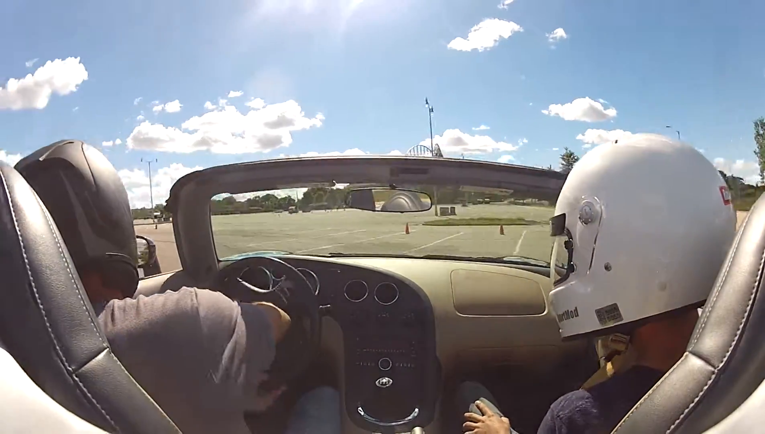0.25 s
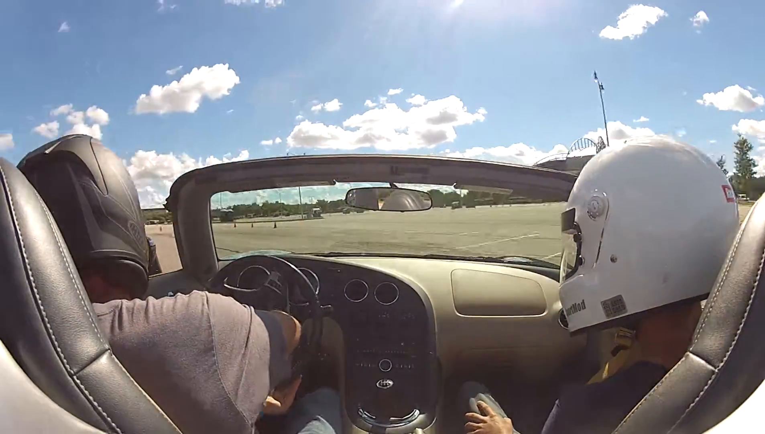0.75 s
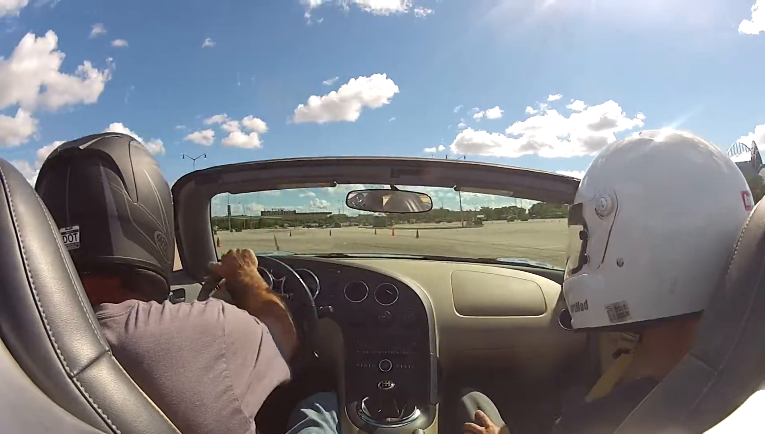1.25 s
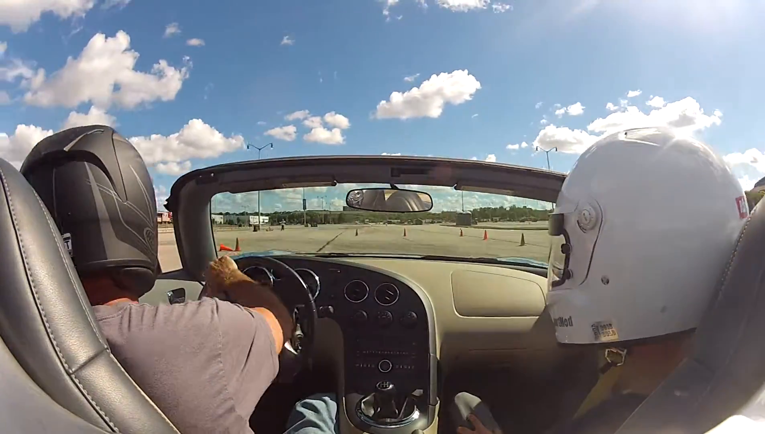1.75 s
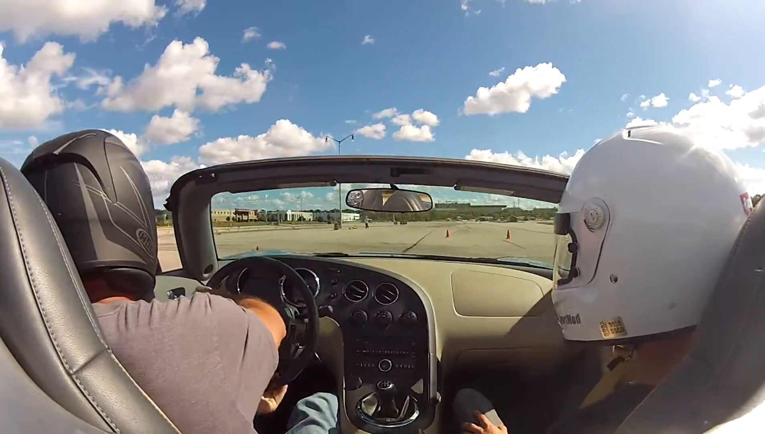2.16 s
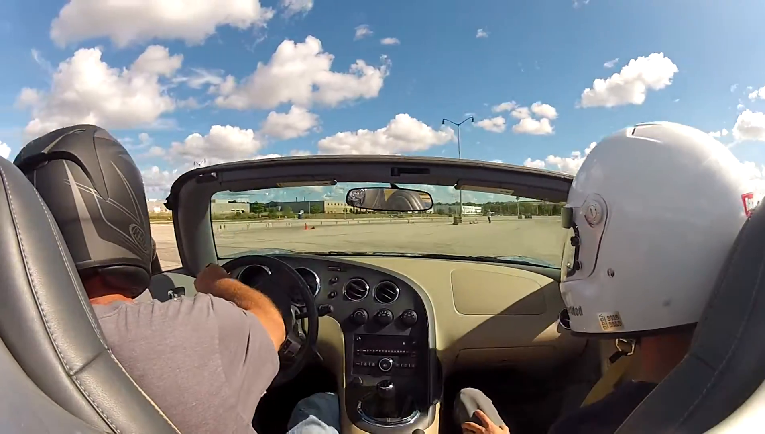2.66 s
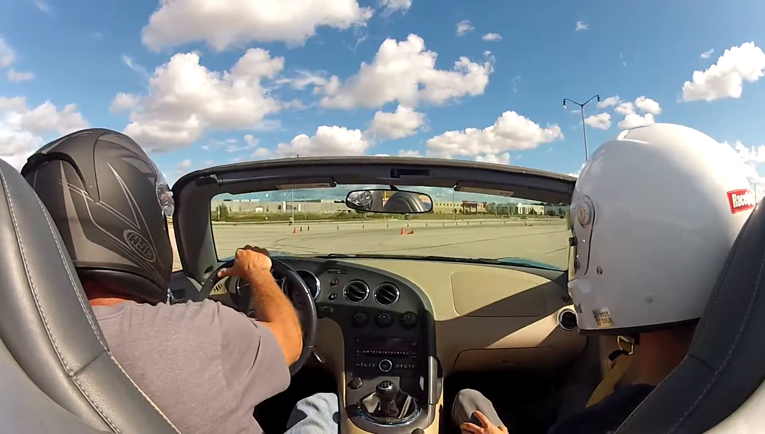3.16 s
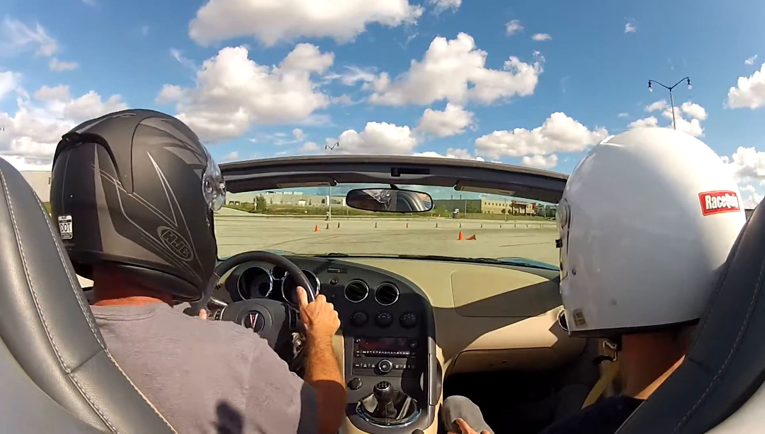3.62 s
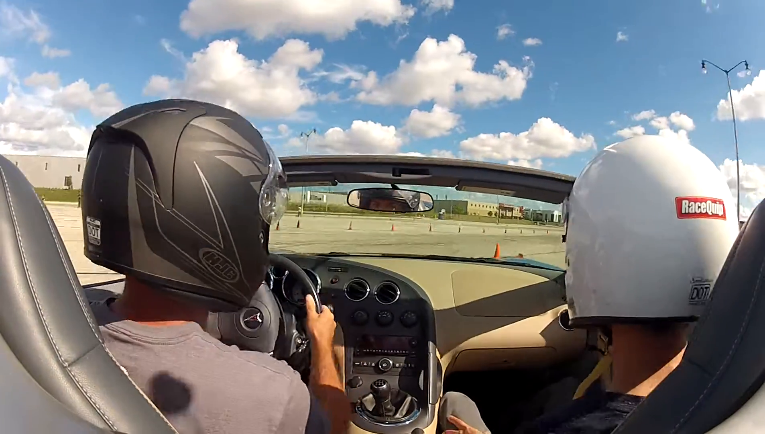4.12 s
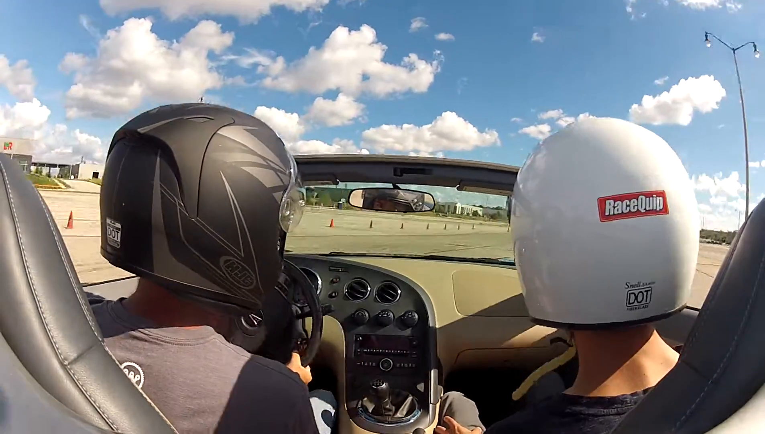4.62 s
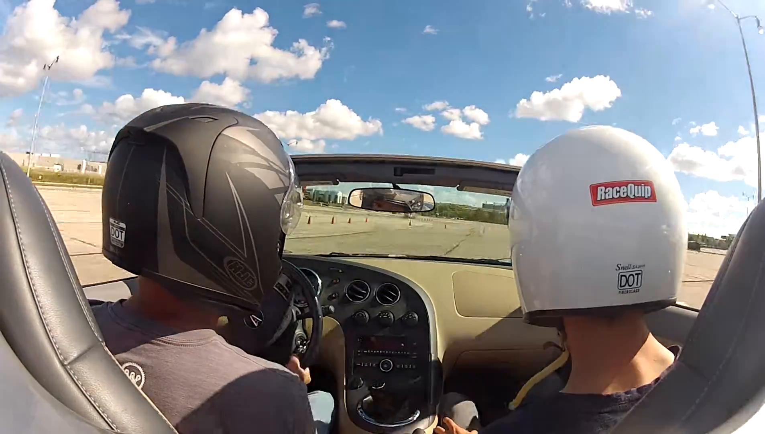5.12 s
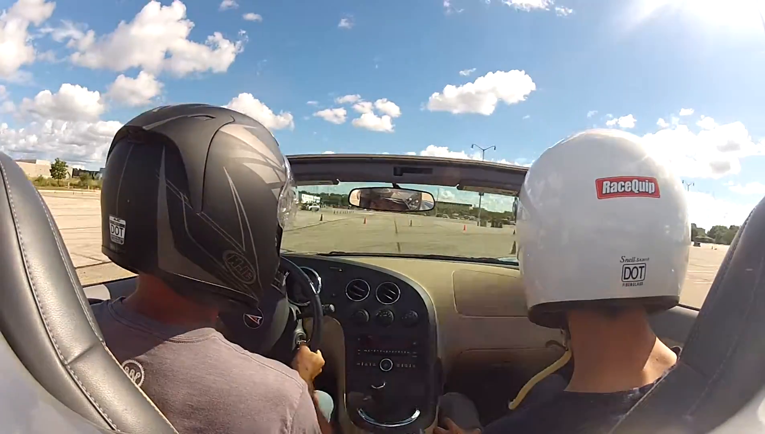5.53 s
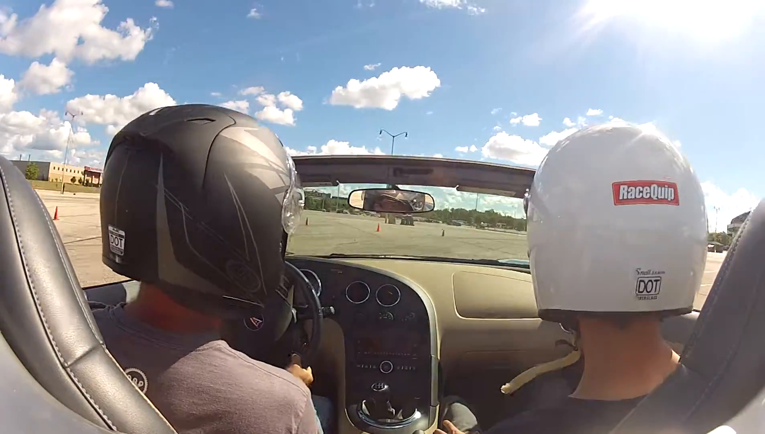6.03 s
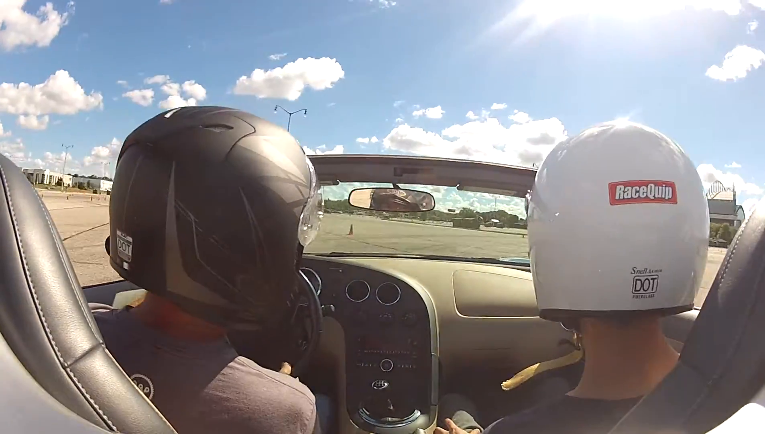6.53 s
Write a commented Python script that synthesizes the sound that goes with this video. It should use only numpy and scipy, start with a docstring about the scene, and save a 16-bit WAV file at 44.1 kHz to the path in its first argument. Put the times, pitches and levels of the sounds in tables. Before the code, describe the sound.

Inside an open sports car cornering hard, a deep four-cylinder engine drones, swells and eases under thudding wind, tyre roar, squeals and rattling trim.

```python
"""A four-cylinder engine booms in an open sports car driven hard round a cone course, heard behind the seats.
Its firing note and other orders follow throttle and revs through cockpit resonances; gusts throb over rumble.
Filtered noise makes tyre roar and intake rasp, wavering tones the corner squeals, ringing modes the judder
chirps, and bursts of tiny contacts the trim rattles, bumps and snap. Timing jitter adds a thin treble fizz."""
import sys
import numpy as np
from scipy import signal
from scipy.fft import rfft, irfft, next_fast_len
from scipy.io import wavfile

SR = 44100
rng = np.random.default_rng(int(sys.argv[2]) if len(sys.argv) > 2 else 0)


def wav_record(signal):
    """Record a signal, one row per channel, as 16-bit PCM in the file named by sys.argv[1]."""
    frames = np.transpose(np.atleast_2d(signal))
    bounded = np.clip(frames, -1, 1)
    # unit amplitude maps onto the largest positive 16-bit level
    quanta = np.round(bounded * 32767).astype(np.int16)
    wavfile.write(sys.argv[1], SR, quanta)


N = 298997
T = np.arange(N) / SR


def gain_of(db):
    """Decibels to amplitude."""
    return 10 ** (np.asarray(db) / 20)


def evened(x):
    """Scales to rms 1."""
    return x / np.sqrt(np.mean(abs(x) ** 2) + 1e-20)


def curves(rows):
    """Columns of a table, joined by straight lines at every sample."""
    s, *columns = np.transpose(rows)
    return [np.interp(T, s, column) for column in columns]


def coloured(x, points):
    """Filters x with a (Hz, dB) spectrum, straight in dB against log frequency."""
    hz, db = np.transpose(points)
    size = next_fast_len(len(x))
    f = np.fft.rfftfreq(size, 1 / SR)
    response_db = np.interp(np.log(f + 1), np.log(hz), db, right=-120)
    return irfft(rfft(x, size) * gain_of(response_db), size)[:len(x)]


def drift(hz):
    """Smooth random curve of rms 1 that changes about hz times a second."""
    step = 32
    count = N // step + 2
    f = np.fft.rfftfreq(count, step / SR)
    slow = irfft(rfft(rng.standard_normal(count)) / (1 + (f / hz) ** 4), count)
    return np.interp(np.arange(N) / step, np.arange(count), evened(slow))


def angle(hz):
    """Running phase in radians of a frequency curve."""
    return 2 * np.pi * np.cumsum(hz) / SR


def add(mix, s, sound):
    """Mixes a sound in at time s."""
    part = mix[max(round(s * SR), 0):][:len(sound)]
    part += sound[:len(part)]


# Engine speed. Each row: time in seconds, cycles per second in Hz (two crank turns, four firings each).
CYCLE_RATE = [(0.0, 28.28), (0.14, 27.52), (1.02, 23.19), (1.13, 26.72), (1.64, 26.09), (1.97, 27),
              (2.29, 29.23), (3.56, 34.37), (3.95, 36.48), (4.18, 35.53), (4.44, 36.64), (5.7, 32.22),
              (6.0, 34.46), (6.3, 35.07), (6.52, 34.92), (6.78, 36.86)]
# Driver trails the throttle, pulls hard, lifts, feeds power in. Each row: time in seconds, throttle 0-1.
THROTTLE_OPENING = [(0.0, 0.32), (1.02, 0.26), (1.15, 0.65), (1.5, 0.72), (2.3, 1.0), (3.95, 0.87),
                    (4.15, 0.04), (5.7, 0.0), (6.4, 0.48), (6.78, 0.64)]
# Firing note. Each row: time in seconds, rms level in dB.
FIRING_LEVEL = [(0, -30), (.6, -23), (.86, -16), (1.02, -17.5), (1.15, -36.5), (2.05, -32.5), (3.08, -35.5),
                (3.36, -23.5), (3.8, -25.5), (4.12, -35.5), (4.48, -27), (5.65, -23.5), (5.8, -34),
                (6.2, -22.5), (6.6, -44), (6.78, -24)]
# Other orders, before cockpit lift. Each row: multiple of the cycle rate, level coasting in dB,
# level at full throttle in dB, gain in dB per doubling of the revs.
ENGINE_ORDERS = [(5, -64, -52.0, -9.5), (6, -54, -55, -4), (7, -72.5, -59, -4.5), (8, -63.0, -49.5, 5.5),
                 (9, -73.5, -70.5, -9.5), (10, -73.5, -63, -20), (11, -74, -69, 9), (12, -59.5, -62.5, 3.5),
                 (13, -70.0, -72, 7.5), (14, -72.0, -70, 13.5), (16, -73, -66.5, 4.5), (17, -80, -72.5, -3),
                 (18, -77.5, -71.0, 5.5), (20, -80, -69, 7.5), (22, -77, -73, 7), (24, -74.5, -72.5, 21.5)]
# Resonances lifting these orders. Each row: centre in Hz, width in Hz, lift in dB.
COCKPIT_RESONANCES = [(161.44, 21, 23.5), (213.3, 32, 9.5), (230.5, 12.3, 7), (271.3, 11.3, 7.5),
                      (313.3, 17, 8.5), (416.6, 16, 3.7), (431, 31.5, 5), (603, 44.6, 14.5)]


def engine(cycle_phase, flutter=0.081, rough=0.13, fading_db=1.85, reference_cycle_hz=32):
    """Firing note, plus orders from uneven cylinders that boom as they cross cockpit resonances."""
    cycle_hz, = curves(CYCLE_RATE)
    throttle, = curves(THROTTLE_OPENING)
    firing_db, = curves(FIRING_LEVEL)
    out = gain_of(firing_db) * (1 + flutter * drift(13)) * np.cos(4 * cycle_phase)
    octaves = np.log2(cycle_hz / reference_cycle_hz)
    for multiple, coast_db, full_db, db_per_octave in ENGINE_ORDERS:
        lift_db = np.zeros(N)
        for hz, width_hz, db in COCKPIT_RESONANCES:
            lift_db += db / (1 + (2 * (multiple * cycle_hz - hz) / width_hz) ** 2)
        drive_db = coast_db + throttle * (full_db - coast_db) + db_per_octave * octaves
        level = gain_of(drive_db + lift_db + fading_db * drift(4.3))
        tone = np.cos(multiple * cycle_phase + rng.uniform(0, 2 * np.pi))
        out += level * (1 + rough * drift(13)) * tone
    return np.sqrt(2) * out  # cosines to rms level


# Cockpit throb. Each row: start in seconds, length before the release in seconds, level in dB.
WIND_GUSTS = [(0, 0.16, -11), (.27, 0.19, -18), (0.488, .19, -16.5), (.76, .2, -18.5), (1.3, .16, -19.5),
              (2.07, 0.12, -15.5), (2.26, .2, -10), (2.478, .27, -13.5), (2.88, .13, -13),
              (3.2, 0.099, -18.5), (3.85, 0.088, -12.5), (3.981, 0.096, -9), (4.28, .12, -18.5),
              (4.52, .13, -13.5), (4.92, .48, -17.5), (5.78, 0.44, -18), (6.32, .17, -23)]
# Turbulence spectrum. Each row: frequency in Hz, relative density in dB per Hz.
RUMBLE_SPECTRUM = [(15, -18.5), (24, -0.5), (36, 4.5), (55, -8), (72, -4.5), (90, 3), (112, -8.5),
                   (140, -6), (172, -10), (200, -18.5), (250, -25), (320, -31.5), (500, -41.5),
                   (900, -63.5)]


def gust_strength(breeze_db=-26, breeze_swing_db=3.5, attack_s=0.042, release_s=0.027):
    """The stronger of the gusts and a drifting breeze."""
    strength = gain_of(breeze_db + breeze_swing_db * drift(5.4))
    for s, length_s, db in WIND_GUSTS:
        attack = np.clip((T - s) / attack_s, 0, 1)
        release = np.exp(-np.maximum(T - s - length_s, 0) / release_s)
        strength = np.maximum(strength, gain_of(db) * attack * release)
    return strength


def wind(buffet_hz=26.88, wander=0.0733, unsteady=0.15, rumble_db=-24,
         road_share=0.42, gust_power=0.15, lumpy_db=1.36):
    """Windscreen vortices throb in the cockpit, over rumble that swells with gusts and road noise."""
    strength = gust_strength()
    road_db, = curves(ROAD_LEVEL)
    throb = np.sqrt(2) * np.sin(angle(buffet_hz * (1 + wander * drift(8.84))))
    rumble = evened(coloured(rng.standard_normal(N), RUMBLE_SPECTRUM))
    swell_db = road_share * (road_db - road_db.mean()) + lumpy_db * drift(4.8)
    swell = gain_of(swell_db) * (strength / strength.mean()) ** gust_power
    return strength * (1 + unsteady * drift(11)) * throb + gain_of(rumble_db) * swell * rumble


# Road loudness. Each row: time in seconds, tyre roar in dB before the overall roar gain.
ROAD_LEVEL = [(0, -53), (.3, -50.5), (1.2, -51), (1.45, -56.5), (2.1, -55), (3.76, -52.5), (3.92, -48),
              (4.3, -52.5), (4.62, -49), (5.18, -48.5), (5.8, -50.3), (6.2, -47.5), (6.78, -46.5)]
# Tyre and air spectrum. Each row: frequency in Hz, relative density in dB per Hz.
ROAR_SPECTRUM = [(150, -10), (400, 1.4), (800, 1.74), (1000, -2.5), (1300, 0.5), (1650, -2.5),
                 (1950, -1.04), (2450, -4.5), (2850, -17.5), (3650, -17), (4200, -25), (5000, -27),
                 (6000, -34.5), (9000, -31.5)]
# Intake spectrum. Each row: frequency in Hz, relative density in dB per Hz.
RASP_SPECTRUM = [(300, -14.5), (470, -1.5), (540, -0.5), (620, -5), (720, -10), (850, -1), (1000, -18),
                 (2500, -16), (5000, -25.5)]


def road(cycle_phase, roar_gain_db=1.63, rasp_db=-59, grit_db=1.03, pulsing=0.063):
    """Gritty tyre and air roar, and intake rasp growing with throttle and revs; firings pulse both."""
    road_db, = curves(ROAD_LEVEL)
    throttle, = curves(THROTTLE_OPENING)
    cycle_hz, = curves(CYCLE_RATE)
    airflow = throttle * (cycle_hz / cycle_hz.mean()) ** 2
    grain = gain_of(grit_db * drift(37)) * (1 + pulsing * np.cos(4 * cycle_phase))
    roar = evened(coloured(grain * rng.standard_normal(N), ROAR_SPECTRUM))
    rasp = evened(coloured(grain * rng.standard_normal(N), RASP_SPECTRUM))
    return gain_of(road_db + roar_gain_db) * roar + gain_of(rasp_db) * airflow * rasp


# Loose-trim spectrum. Each row: frequency in Hz, relative density in dB per Hz.
TRIM_SPECTRUM = [(600, -23), (1500, 1.5), (2600, 3.5), (3100, -5.5), (3700, 3), (4300, -11), (5000, -14.5),
                 (6000, -26), (8000, -10), (10000, -13.5), (14000, -33.5)]


def chatter(level_db=-22, ticks_per_s=700):
    """Trim ticks faintly throughout, harder as the road gets louder."""
    road_db, = curves(ROAD_LEVEL)
    ticks = rng.standard_normal(N) * (rng.random(N) < ticks_per_s / SR)
    shaken = gain_of(2 * road_db) * ticks
    return gain_of(road_db.mean() + level_db) * evened(coloured(shaken, TRIM_SPECTRUM))


def knocks(rows, spectrum, gain_db, rise_s, grit=0.11):
    """Bursts of tiny contacts that build up and die away exponentially."""
    t, out = np.arange(SR // 8) / SR, np.zeros(N)
    for s, db, decay_s in rows:
        contacts = rng.standard_normal(len(t)) * (grit + (rng.random(len(t)) < 0.03))
        shape = (1 - np.exp(-t / rise_s)) * np.exp(-t / decay_s)
        add(out, s, gain_of(db + gain_db) * evened(contacts) * shape / shape.max())
    return coloured(out, spectrum)


# Loud shakes. Each row: start in seconds, level in dB before gain and colouring.
LOUD_RATTLES = [(.1037, -49.5), (0.2505, -43), (1.107, -51.5), (1.8658, -44), (4.147, -37.5), (4.258, -46),
                (4.5022, -45.5), (4.6913, -40), (4.771, -40.5), (4.791, -40), (4.8742, -40.5),
                (5.2045, -35.5), (5.219, -42), (5.5164, -41), (5.5623, -39.5), (5.656, -42), (6.1534, -41),
                (6.2705, -37), (6.374, -38.5), (6.503, -39.5), (6.594, -45.5), (6.6172, -41.5),
                (6.665, -42.5), (6.7654, -33)]


def rattles(decay_s=0.0047, peak_faint_per_s=13):
    """Loose trim: loud shakes, and random faint ones that come oftener and harder on a loud road."""
    road_db, = curves(ROAD_LEVEL)
    chance = peak_faint_per_s / SR * gain_of(road_db - road_db.max()) ** 2
    rows = [(s, db, decay_s) for s, db in LOUD_RATTLES]
    for i in np.flatnonzero(rng.random(N) < chance):
        rows.append((T[i], road_db[i], decay_s))
    return knocks(rows, TRIM_SPECTRUM, gain_db=1, rise_s=0.036)


# One per corner. Each row: start in seconds, length in seconds, level in dB before partial level and slip,
# starting pitch in Hz, greatest slip 0-1.
CORNER_SQUEALS = [(0.212, 0.89, -46, 628.7, 0.84), (4.541, 0.92, -54.5, 634.4, 0.8)]
# Each row: ratio to the squeal pitch, width in Hz, relative level in dB.
TREAD_PARTIALS = [(1.001, 9, -3), (1.01, 80, -6), (1.945, 28, -9.5), (1.955, 65, -4.5), (2.621, 110, -14.5),
                  (3.06, 140, -10.5)]


def squeal(waver=0.35, attack_s=0.19, release_s=0.25, sag_hz_per_s=7, swell_power=0.45):
    """Tread sticks and slips: a wavering tone whose fuzzy overtones grow as slip builds, holds, lets go."""
    out = np.zeros(N)
    for s, length_s, level_db, pitch_hz, top_slip in CORNER_SQUEALS:
        age_s = np.clip(T - s, 0, length_s)
        slip = np.clip(np.minimum(age_s / attack_s, (length_s - age_s) / release_s), 0, 1)
        hz = pitch_hz - sag_hz_per_s * age_s
        for ratio, width_hz, db in TREAD_PARTIALS:
            tone = np.cos(angle(ratio * hz + width_hz / 2 * drift(width_hz)))
            brightness = np.clip(top_slip * slip, 0.01, 1) ** (ratio - 1)
            level = gain_of(level_db + db) * slip ** swell_power * brightness
            out += level * evened(tone * (1 + waver * drift(width_hz)))
    return out


# Suspension jolts on a rough patch. Each row: start in seconds, level in dB before the chirp gain and modes.
JOLTS = [(3.8536, -39.5), (3.8952, -29), (3.914, -38), (3.946, -33.5), (3.9744, -34.5), (4.014, -32),
         (4.0337, -34), (4.0701, -36), (4.0886, -39)]
# Each row: mode frequency in Hz, relative level in dB, 60 dB decay time in seconds.
CHIRP_MODES = [(1577, 4, 0.063), (1436.4, -12.5, .04), (1247, -1, 0.041), (1910, -2, .04),
               (2228, -5, 0.033), (3030, -8.5, 0.035), (3630, -4.5, 0.017)]


def judder(gain_db=-3, rise_s=0.0029, scrape=0.5):
    """Each jolt rubs a part that chirps in a few modes, roughened by the scraping."""
    t, out = np.arange(SR // 8) / SR, np.zeros(N)
    for s, jolt_db in JOLTS:
        for hz, db, t60_s in CHIRP_MODES:
            grit = evened(coloured(rng.standard_normal(len(t)), [(300, -3), (900, -11)]))
            ring = np.sin(2 * np.pi * (hz * t + rng.random())) * (1 + scrape * grit)
            decay = gain_of(jolt_db + gain_db + db - 60 * t / t60_s)
            add(out, s, decay * (1 - np.exp(-t / rise_s)) * ring)
    return out


# Paving seams. Each row: start in seconds, level in dB before gain and colouring, decay constant in seconds.
SEAM_BUMPS = [(4.291, -37.5, 0.0066), (5.844, -31, 0.003), (6.504, -38.5, 0.0029), (6.596, -32.5, 0.014)]
# Each row: frequency in Hz, relative density in dB per Hz.
BUMP_SPECTRUM = [(150, -9), (500, 1), (1000, -6.5), (2200, -1), (3000, -15.5), (5000, -25), (9000, -47.5)]


def bumps():
    """Seams in the paving give dull knocks: contact bursts with little treble."""
    return knocks(SEAM_BUMPS, BUMP_SPECTRUM, gain_db=5.5, rise_s=0.00072)


# Each row: start in seconds, level in dB before gain and colouring, decay constant in seconds.
HARD_SNAP = [(5.9075, -30.5, 0.0045)]
# Each row: frequency in Hz, relative density in dB per Hz.
SNAP_SPECTRUM = [(1000, -40), (2000, -8), (2800, -0.5), (3200, -2), (3700, 2), (4300, -6), (4800, -5.5),
                 (6000, -9), (8000, -15), (10000, -26), (14000, -30.5)]


def snap():
    """One hard snap: a fast-rising contact burst, strongest in the upper mids."""
    return knocks(HARD_SNAP, SNAP_SPECTRUM, gain_db=1.5, rise_s=0.00028)


def scene():
    """Sum of all sources behind the seats; engine and road share one slightly unsteady cycle phase."""
    cycle_hz, = curves(CYCLE_RATE)
    cycle_phase = angle(cycle_hz * (1 + 0.0018 * drift(5.8)))
    out = engine(cycle_phase) + wind() + road(cycle_phase)
    out += chatter() + rattles() + squeal() + judder() + bumps() + snap()
    return out[None]


def record(dry, jitter_samples=1.4, clock_hz=12000, edge_hz=15050):
    """Regular sample-timing jitter mirrors the sound about a high tone; then the band limit."""
    fizz = jitter_samples * np.gradient(dry, axis=1) * np.cos(2 * np.pi * clock_hz * T)
    low_pass = signal.firwin(401, edge_hz, window=("kaiser", 9), fs=SR)
    return signal.oaconvolve(dry + fizz, low_pass[None], "same")


dry = scene()
out = record(dry)
wav_record(out)
```